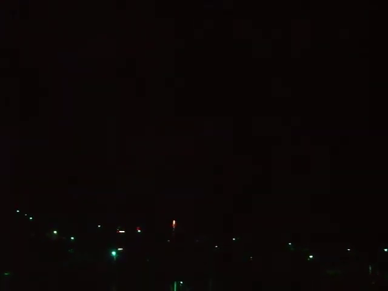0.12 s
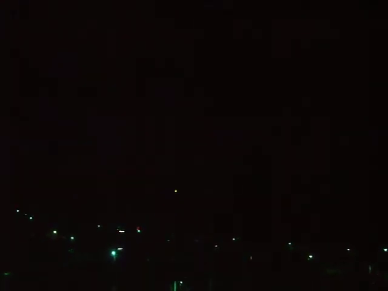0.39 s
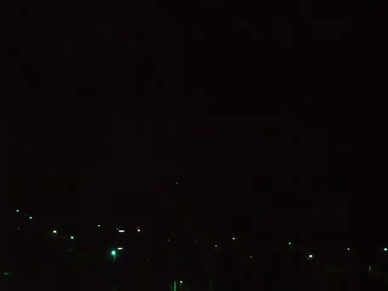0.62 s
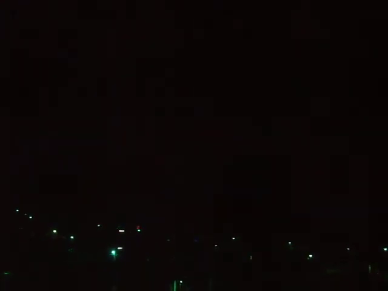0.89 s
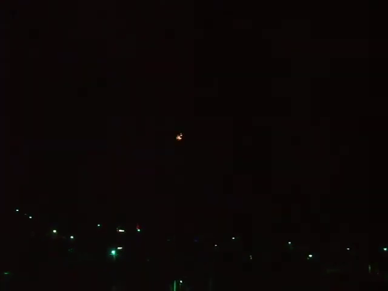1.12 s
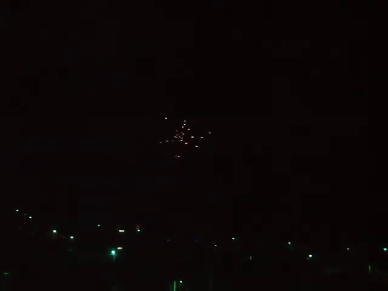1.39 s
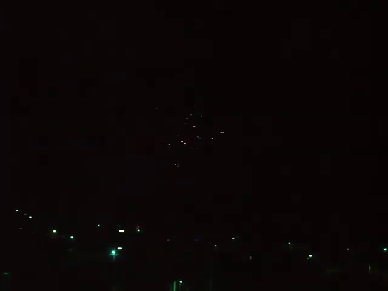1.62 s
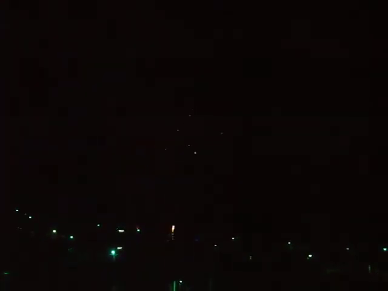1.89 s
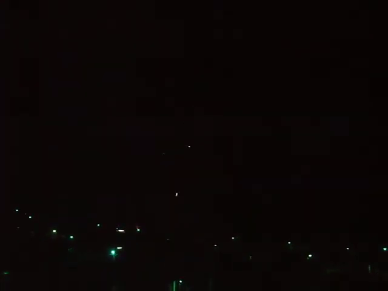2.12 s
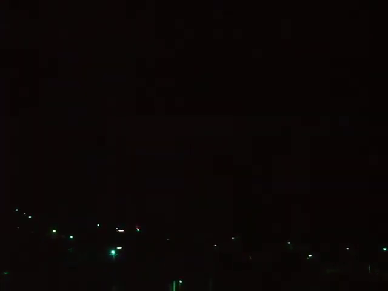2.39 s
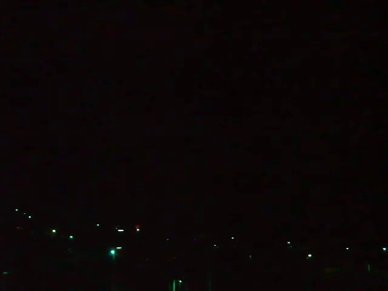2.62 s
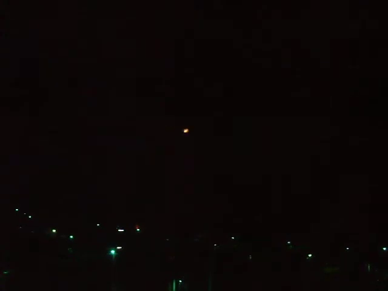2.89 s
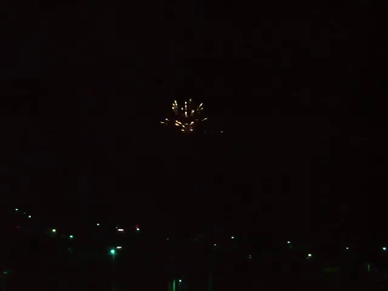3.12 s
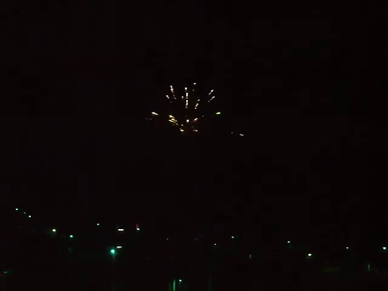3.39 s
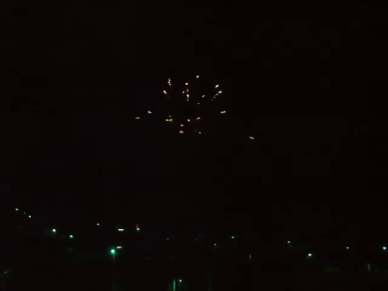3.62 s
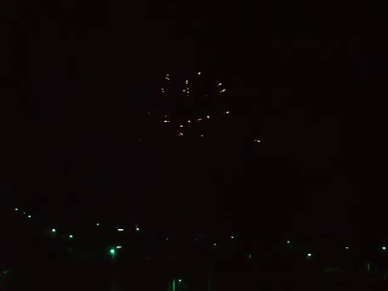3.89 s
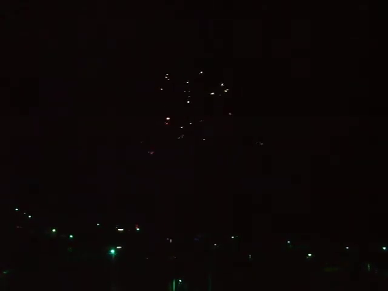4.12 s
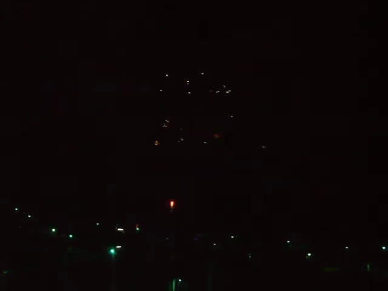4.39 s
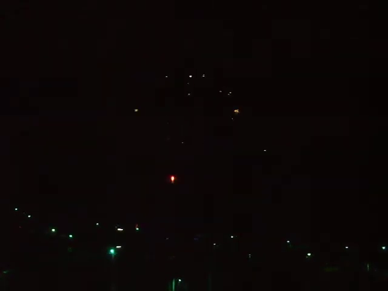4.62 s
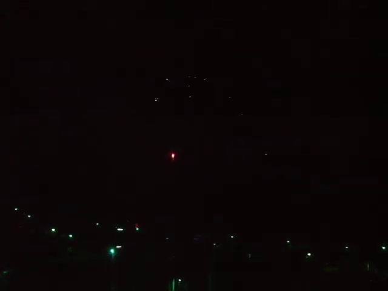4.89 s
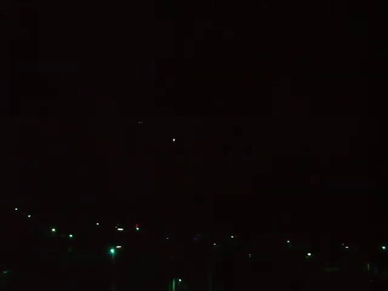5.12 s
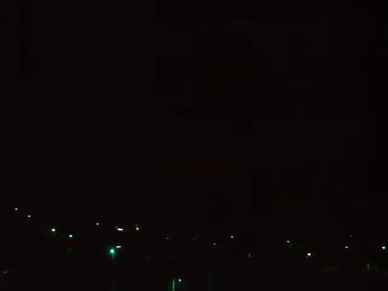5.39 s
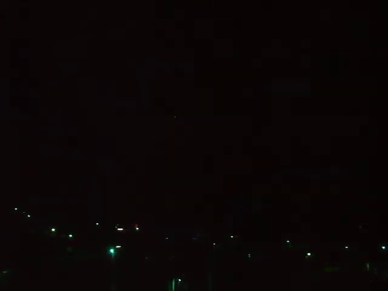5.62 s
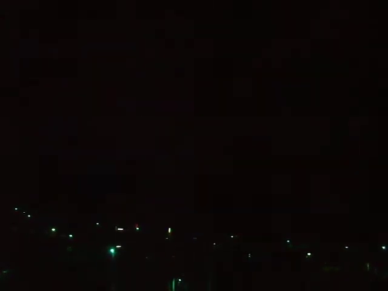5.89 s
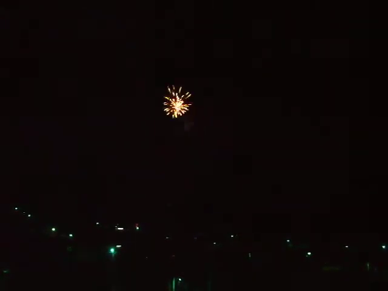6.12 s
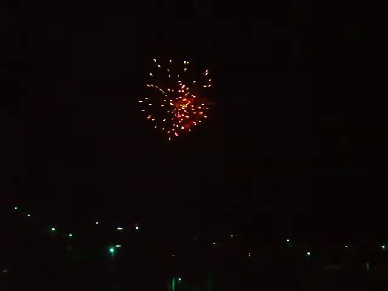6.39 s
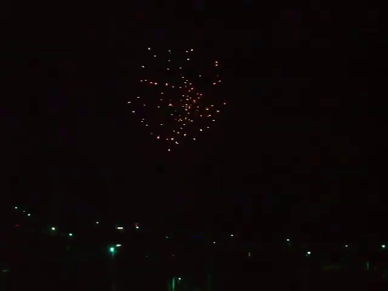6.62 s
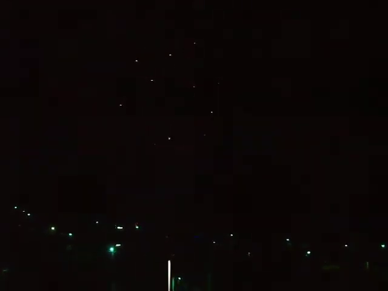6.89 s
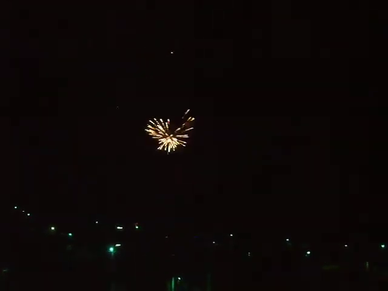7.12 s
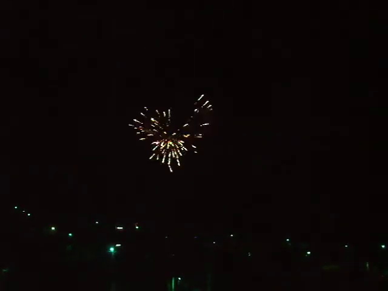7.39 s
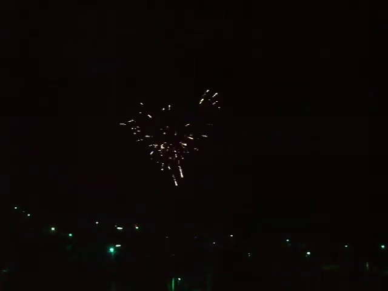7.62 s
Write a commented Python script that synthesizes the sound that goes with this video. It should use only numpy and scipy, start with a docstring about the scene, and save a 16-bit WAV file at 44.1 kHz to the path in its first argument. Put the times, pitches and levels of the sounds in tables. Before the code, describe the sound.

A faint town murmur with soft hiss runs throughout, with the far echo of an earlier burst still fading at the start. A mortar thumps at 0.2 s with quick slapping reflections; at 1.4 s a shell bangs sharply overhead, brief metallic chirps follow, and a dense roll returns from buildings. Another thump comes at 2.0 s, light crackles and dull pops near 2.7, and a second big bang at 3.2 with a long rumbling tail. A thump at 4.3 leads into scattered dry crackles until about 5.3. From 5.2 to 6.35 a breathy, wavering whistle around 1.9 kHz swells, sinking slightly, with a thump at 6.0. Bangs crack at 6.4, 7.0 and 7.2, with crackles, pops and a hollow echo swell around 7.1, then the roll decays to the end. The small microphone sounds narrow and clips on every bang.

```python
"""Fireworks over a town at night

Shaped noise makes the town's murmur; a breathy whistle of narrow noise and wavering tones passes over it.
Stars crackle as brief damped sines. Mortars thump and shells burst overhead as blast waves with echoes and
rings, and each bang rolls back from the buildings as a dense swarm of random clicks in moving bands.
A small narrow-band microphone overloads on the bangs."""
import sys
import numpy as np
from scipy import signal
from scipy.io import wavfile

SR = 44100
rng = np.random.default_rng(int(sys.argv[2]) if len(sys.argv) > 2 else 0)


def wav_out(sig):
    """Save sig, one row per channel (or a flat mono array), as 16-bit PCM at SR to the path in sys.argv[1]."""
    wavfile.write(sys.argv[1], SR, np.round(np.clip(np.atleast_2d(sig).T, -1, 1) * 32767).astype(np.int16))


def attenuation_scalar(level_db):
    """Turn a level in dB into a linear amplitude multiplier (20 dB per decade)."""
    decades = np.asarray(level_db, float) / 20
    return 10 ** decades


N = 342216


def rms_one(x):
    """Scale to unit rms."""
    return x / np.sqrt(np.mean(x ** 2) + 1e-20)


def in_time(rows):
    """Columns of a curve at every sample."""
    s, *columns = np.transpose(rows)
    return [np.interp(np.arange(N) / SR, s, column) for column in columns]


def at_hz(points, hz):
    """Read a spectrum on a log frequency axis."""
    point_hz, point_db = np.array(points)[:, 0], np.array(points)[:, 1]
    return np.interp(np.log(hz), np.log(point_hz), point_db)


def drift(rate_hz, size=1):
    """Slow random wander of spread one, drawn at every size-th sample."""
    r = np.exp(-2 * np.pi * rate_hz * size / SR)
    noise = rng.standard_normal((N + SR) // size)
    slow = signal.lfilter([1], [1, -2 * r, r * r], noise)[SR // size - 1:]   # skip the settling
    return np.interp(np.arange(N) / size, np.arange(len(slow)), rms_one(slow))


def add(out, s, sound):
    """Mix a short sound in at a time."""
    i = round(s * SR)
    out[i:i + len(sound)] += sound[:N - i]


def banded(source, spectrum, patchy_db, tilts_db=(0, 0, 0, 0)):
    """Third-octave bank; moving gains at four anchor pitches are blended across the bands."""
    out = 0
    edges = 24 * 2 ** np.arange(0, 8.3, 1 / 3)
    for k, (low, high) in enumerate(zip(edges, edges[1:])):
        bandpass = signal.butter(2, [low, high], "band", fs=SR, output="sos")
        band = signal.sosfilt(bandpass, source[k % 2])   # neighbours use independent sources
        hz = np.sqrt(low * high)
        place = np.interp(np.log(hz), np.log([140, 450, 1100, 2800]), np.arange(4))
        tilt_db = sum(max(1 - abs(place - j), 0) * t for j, t in enumerate(tilts_db) if abs(place - j) < 1)
        out = out + band * attenuation_scalar(at_hz(spectrum, hz) + tilt_db + patchy_db * drift(4.0, size=32))
    return out


def breathy(rows, wide_hz, waver_hz=18.0):
    """A wavering clear core in a breathy skirt of narrow noise; all skirt if rows give no breath."""
    hz, db, *breath = in_time(rows)
    t = np.arange(N) / SR
    fade_in = np.clip((t - rows[0][0]) / .015, 0, 1)
    fade_out = np.clip((rows[-1][0] - t) / .015, 0, 1)
    wide = np.clip(breath[0] / 100, 0, 1) if breath else 1
    phase = 2 * np.pi * np.cumsum(hz + waver_hz * drift(30.6, size=8)) / SR
    core = np.sqrt(2) * attenuation_scalar(1.5 * drift(40.0, size=8)) * np.cos(phase)
    skirt = drift(wide_hz, size=8) * np.cos(phase) + drift(wide_hz, size=8) * np.sin(phase)
    return fade_in * fade_out * attenuation_scalar(db) * (np.sqrt(1 - wide) * core + np.sqrt(wide) * skirt)


def ring(clicks, hz, t60):
    """A unit click sets a decaying sine of height one ringing."""
    r, w = attenuation_scalar(-60 / (t60 * SR)), 2 * np.pi * hz / SR
    return signal.lfilter([0, np.sin(w)], [1, -2 * r * np.cos(w), r * r], clicks + 1e-18)


def rung(clicks, modes):
    """All modes struck by the same clicks."""
    return sum(attenuation_scalar(db) * ring(clicks, hz, t60) for hz, db, t60 in modes)


def blast(push_ms, suck_ms, suck):
    """Sudden overpressure, then a longer underpressure; the capsule inverts it."""
    t_ms = np.arange(round(.006 * SR)) / SR * 1000
    push = (t_ms < push_ms) * (.5 * t_ms / push_ms - 1)
    after = np.clip((t_ms - push_ms) / suck_ms, 0, 1)
    return push + suck * np.abs(np.sin(np.pi * after ** 0.77)) ** 0.44


# colour of the town's murmur: f/Hz, relative density/dB
TOWN_COLOUR = [(15, -33), (25, -18.5), (64, -11), (132, -11), (314, -5.5), (495, -3), (1350, -16),
               (3940, -19), (4720, -21), (5800, -26.5), (7540, -55), (12800, -120)]


def town():
    """Far traffic and microphone hiss as one steady shaped noise."""
    noise = rng.standard_normal((2, N))
    return attenuation_scalar(-47.5) * rms_one(banded(noise, TOWN_COLOUR, patchy_db=0.0))


# main tone of the whistle: t/s, f/Hz, level/dB, breath/%
WHISTLE_TONE = [(5.17, 1985, -48, 50), (5.21, 1970, -40, 60), (5.45, 1905, -33, 56), (5.63, 1855, -26, 50),
                (5.8, 1840, -29, 50), (5.89, 1800, -35, 55), (5.99, 1778, -22, 45), (6.035, 1780, -30, 40),
                (6.07, 1792, -24.5, 16), (6.24, 1788, -33.5, 30), (6.355, 1810, -41, 45)]
# upper tones that follow it: pitch ratio, offset from its usual level/dB, share of its swing,
# start t/s, end t/s, skirt width f/Hz
WHISTLE_UPPERS = [(1.37, -10.5, .6, 5.17, 6.1, 190), (2.345, -11, 1.6, 5.22, 6.08, 120),
                  (2.99, -23, 1.1, 6.03, 6.31, 45), (3.14, -25, 1.1, 6.03, 6.3, 45)]
# short upward flicks of pitch: t/s, level/dB
WHISTLE_FLICKS = [(6.185, -33.0), (6.325, -41.0)]
# colour of the jet's rush: f/Hz, relative density/dB
RUSH_COLOUR = [(900, -25), (1500, -6), (2200, 0.1), (3500, -4), (5000, -8), (5800, -18), (7500, -50)]


def whistle():
    """Air noise caught in a few resonances that sink slowly together, over the rush of the jet."""
    usual_db, upper_breath = -27, 80   # breath in %
    s, hz, db, _ = np.transpose(WHISTLE_TONE)
    out = breathy(WHISTLE_TONE, 150.0)
    for ratio, less_db, swing, start, end, wide_hz in WHISTLE_UPPERS:
        t = np.r_[start, s[(s > start) & (s < end)], end]
        upper_hz = ratio * np.interp(t, s, hz)
        upper_db = usual_db + less_db + swing * (np.interp(t, s, db) - usual_db)
        out += breathy(np.c_[t, upper_hz, upper_db, upper_breath + 0 * t], wide_hz)
    for start, flick_db in WHISTLE_FLICKS:
        rise = [(start, 1900, flick_db), (start + .021, 2100, flick_db)]
        tail = [(start + .052, 2100, flick_db - 4.0)]
        out += breathy(rise + tail, 14.0)
    # the rush follows .45 of the whistle's swing and stops with it
    rush_db = np.interp(np.arange(N) / SR, s, .45 * (db - db.mean()), left=-99, right=-99)
    rush = rms_one(banded(rng.standard_normal((2, N)), RUSH_COLOUR, patchy_db=1.5))
    return out + attenuation_scalar(-43.5 + rush_db) * rush


def hollow():
    """A hollow swell of echoes from one far block: narrow noise that rises and falls."""
    s, hz, peak_db, slope_s = 7.11, 890, -20, .11
    edge_db = peak_db - 11
    return breathy([(s - slope_s, hz, edge_db), (s, hz, peak_db), (s + slope_s, hz, edge_db)], 220.0)


# falling chirps off a railing: t/s, length/ms, start f/Hz, end f/Hz, level/dB before unevenness
RAILING_CHIRPS = [(1.452, 48, 4200.0, 2530, -32.5), (1.474, 18, 4877, 3700, -27.5),
                  (6.428, 37, 4200.0, 2600.0, -30.0)]


def railing():
    """Evenly spaced bars echo a blast ever further apart, so the echo train falls in pitch."""
    out = np.zeros(N)
    for s, length_ms, from_hz, to_hz, db in RAILING_CHIRPS:
        share = np.linspace(0, 1, round(length_ms / 1000 * SR))
        uneven_db = 6.5 * drift(120.0, size=32)      # the bars do not all reflect alike
        hz = from_hz * (to_hz / from_hz) ** share
        chirp = np.sin(2 * np.pi * np.cumsum(hz) / SR)
        add(out, s, attenuation_scalar(db + uneven_db[:len(share)]) * np.sin(np.pi * share) * chirp)
    return out


def answer(s, db, bass_db, shape, tilts):
    """Power in bass, low mids, upper mids and treble of one bang's roll, at every 32nd sample."""
    fill_in_s, dulled_after_s = .018, 1.02   # the start's colour fades; dulling stops growing
    delay = np.arange(0, N + 32, 32) / SR - s
    mid_db = db + np.interp(delay, *np.transpose(shape), left=-200, right=-200)
    bass, upper, treble = [level_db - loss_db * np.clip(delay, 0, dulled_after_s)
                           - late_db * np.exp(-abs(delay) / fill_in_s)
                           for level_db, loss_db, late_db in tilts]
    return attenuation_scalar(mid_db + np.array([bass + bass_db, 0 * delay, upper, treble])) ** 2


# shells that set the town rolling, the first burst earlier: t/s, relative level/dB, extra bass level/dB
SHELL_ROLLS = [(-2.65, 0.1, 0.1), (1.3998, 0.1, 0.1), (3.1905, 0.1, -0.5), (6.3601, 0.1, 0.5),
               (6.9667, -6.0, -15.0), (7.2337, -0.5, 0.5)]
# the town's answer to a shell, near blocks first, far hills late: delay t/s, relative low-mid level/dB
SHELL_DECAY = [(.004, -23), (.03, -24), (.12, -21), (.3, -22.5), (.4, -26), (.47, -23.5), (.58, -28),
               (.72, -32), (.84, -31), (1.05, -35.5), (1.2, -39.5), (1.45, -44), (1.62, -38), (1.95, -40),
               (2.4, -38), (2.75, -43), (3.3, -51), (4.0, -68)]
# and to a mortar: delay t/s, relative low-mid level/dB
MORTAR_DECAY = [(.004, -23), (.035, -28), (.07, -29.5), (.11, -28), (.16, -32), (.26, -38.5), (.36, -48),
                (.6, -55), (1.2, -70)]
# tilt of a roll, rows bass, upper mids, treble: level/dB over low mids before the band trims,
# loss/(dB per s) of delay, level missing at the start/dB (negative: surplus)
SHELL_TILT = [(-1.0, 14.0, 0.1), (-5.7, 0.1, 18.0), (-11.0, 7.5, 18.0)]
MORTAR_TILT = [(-19.0, 0.1, 0.1), (0.5, 3.0, 9.0), (-7.5, 8.0, -7.0)]
# colour of the swarm before tilting: f/Hz, relative density/dB
SWARM_COLOUR = [(15, -53.5), (25, -28.5), (75, -14), (199, 0), (368, 1), (432, -2.5), (713, -3),
                (980, -13.5), (1440, -10), (2130, -13.5), (2610, -10.5), (3280, -16), (4120, -17.5),
                (5060, -26), (5800, -39), (7540, -69), (12800, -120)]
# mortars firing, also played by launches(): t/s, level/dB of the thump before its bass is thinned
MORTARS = [(.1567, -3.3), (1.998, -1.2), (4.304, -4.7), (5.9916, -1.0)]


def roll():
    """Thousands of reflections a second of uneven strength; the rolls of all bangs add up."""
    power = sum(answer(s, db, bass_db, SHELL_DECAY, SHELL_TILT) for s, db, bass_db in SHELL_ROLLS)
    power = power + sum(answer(s, .3 * db, 0, MORTAR_DECAY, MORTAR_TILT) for s, db in MORTARS)
    bass_db, mid_db, upper_db, treble_db = [
        np.interp(np.arange(N) / 32, np.arange(len(p)), 10 * np.log10(p)) for p in power]
    strengths = attenuation_scalar(2.6 * np.minimum(rng.exponential(1, (2, N)), 5))
    signed = strengths * rng.choice([-1, 1], (2, N))
    echoes = rms_one(signed * (rng.random((2, N)) < 2600.0 / SR))   # 2600 a second on average
    tilts_db = (bass_db + 4.0, mid_db, upper_db + 7.0, treble_db + 10.5)
    swarm = banded(echoes, SWARM_COLOUR, patchy_db=1.4, tilts_db=tilts_db)
    return attenuation_scalar(17.5 + 0.83 * drift(27.0, size=32)) * swarm


# stars crackling, thin and dry: t/s, level/dB before lift and bass cut, centre f/Hz
STAR_CRACKLE = [(2.68, -27, 2600), (2.7103, -24, 2400), (2.73, -15, 2300), (3.5868, -18, 3000),
                (4.1448, -17.5, 3740), (4.2188, -19, 3760), (4.4389, -12, 3060), (4.5361, -12.5, 3420),
                (4.557, -31, 3210), (4.6667, -7, 3800), (4.6798, -14, 3310), (4.6944, -24, 3420),
                (4.8393, -16.5, 3630), (4.8504, -19, 3600), (4.9013, -31, 4200), (4.9288, -20, 3130),
                (5.011, -22.5, 3920), (5.2839, -23, 4260), (6.3315, -20, 3580), (6.8304, -12, 3290),
                (7.017, -16, 3660), (7.043, -11, 3130), (7.061, -12.5, 3380), (7.1077, -10, 3110)]
# lone dull echoes standing out of the roll: t/s, level/dB before lift and bass cut, centre f/Hz
DULL_POPS = [(1.526, -4, 651), (2.619, -16, 501), (2.678, -23, 770), (2.709, -19.5, 764), (2.727, -13, 735),
             (2.852, -25, 544), (4.503, -13.5, 620), (4.631, -21, 520), (4.765, -21, 519),
             (4.791, -23, 604), (4.809, -21, 600), (7.059, -8, 638), (7.088, -15, 856), (7.091, -17, 800),
             (7.102, -7.5, 1070), (7.109, -4, 870)]


def pops(events, cycles, cut_hz, rise_s):
    """Each pop is a damped sine, 60 dB down after a few cycles, with its bass cut."""
    out, t = np.zeros(N), np.arange(round(.012 * SR)) / SR
    for s, db, hz in events:
        decay = attenuation_scalar(-60 * t * hz / cycles)
        add(out, s + rise_s, -attenuation_scalar(db + 4.5) * np.sin(2 * np.pi * hz * t) * decay)
    return signal.sosfilt(signal.butter(2, cut_hz, "high", fs=SR, output="sos"), out)


# fixed reflectors near the mortars: delay t/ms, level/dB relative to the thump, sign
MORTAR_ECHOES = [(1.7, -7.0, 1), (10.5, -10.0, 1), (17.0, -9.0, 1), (38.2, -4.5, -1), (93.5, -11.0, 1),
                 (109.3, -10.0, 1), (147.5, -13.0, -1)]
# what a thump leaves ringing at the microphone: f/Hz, level/dB relative to its click, t60/s
MORTAR_RING = [(2600.0, -8.5, 0.011), (650.0, -33, 0.016)]


def launches():
    """A short blast thump, repeated more dully by the same reflectors every time."""
    out, clicks = np.zeros(N), np.zeros(N)
    direct = blast(.37, 0.62, suck=0.28)
    dull = signal.lfilter([.2], [1, -.8], blast(.5, 1.6, suck=.25))
    for s, db in MORTARS:
        add(out, s, attenuation_scalar(db) * direct)
        add(clicks, s + .001, attenuation_scalar([db]))
        for delay_ms, echo_db, sign in MORTAR_ECHOES:
            add(out, s + delay_ms / 1000, sign * attenuation_scalar(db + echo_db) * dull)
            add(clicks, s + delay_ms / 1000, sign * attenuation_scalar([db + echo_db]))
    highpass = signal.butter(4, 150.0, "high", fs=SR, output="sos")
    thin = signal.sosfilt(highpass, out)   # the tube sends little bass this way
    return thin + rung(clicks, MORTAR_RING)


# shells bursting: t/s, peak level/dB at the capsule before it saturates, push t/ms,
# ground echo relative level/dB before dulling, wall echo delay t/ms
SHELL_BURSTS = [(1.3998, 6.0, .55, -4.0, 14.4), (3.1905, 6.0, .65, -5.0, 15.2),
                (6.3601, 7.0, .7, -15.0, 16.1), (6.9667, 4.0, .45, -15.0, 11.4),
                (7.2337, 5.0, .6, -13.0, 12.6)]
# what a blast leaves ringing at the microphone: f/Hz, level/dB relative to its click, t60/s
SHELL_RING = [(286, -16.5, 0.084), (133, -14, 0.048), (85, -22, .15)]


def bursts():
    """Blast wave, its duller copies from ground and wall, and a low ring."""
    out, clicks = np.zeros(N), np.zeros(N)
    for s, db, push_ms, ground_db, wall_ms in SHELL_BURSTS:
        wave = attenuation_scalar(db) * blast(push_ms, 2.01 * push_ms, suck=0.45)
        dull = signal.lfilter([.12], [1, -.88], wave)      # glancing echoes lose their edge
        add(out, s, wave)
        add(out, s + .0027, attenuation_scalar(ground_db) * dull)
        add(out, s + wall_ms / 1000, attenuation_scalar(-14.0) * dull)
        add(clicks, s + .0068, attenuation_scalar([db - 10]))
    return out + rung(clicks, SHELL_RING)


def scene():
    """All sources in one channel."""
    background = town() + whistle()
    echoes = hollow() + railing() + roll()
    crackle = pops(STAR_CRACKLE, cycles=5.2, cut_hz=1700.0, rise_s=0.00101)
    dull_pops = pops(DULL_POPS, cycles=5.7, cut_hz=560.0, rise_s=0.00274)
    return (background + echoes + crackle + dull_pops + launches() + bursts())[None]


def band_limit(x):
    """A steep low-pass at the top of the band."""
    return signal.sosfilt(signal.butter(12, 16340, fs=SR, output="sos"), x)


def record(dry):
    """The capsule saturates; a steep symmetric low-pass rings ahead of fronts; a later stage cuts them flat."""
    capsule_limit, top_hz, offset, overload = 0.91, 5725, -.003, .715   # levels of full scale
    taps = signal.firwin(161, top_hz, window=("kaiser", 8.0), fs=SR)
    saturated = np.clip(dry, -capsule_limit, capsule_limit)
    narrow = signal.fftconvolve(saturated, taps[None], mode="same")
    flat = np.clip(narrow + offset, -overload, overload)
    return band_limit(flat)


dry = scene()
out = record(dry)
wav_out(out)
```